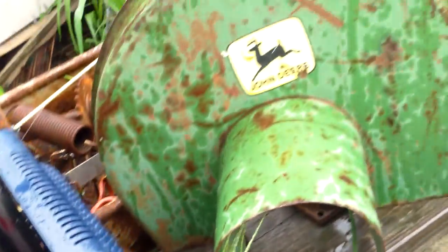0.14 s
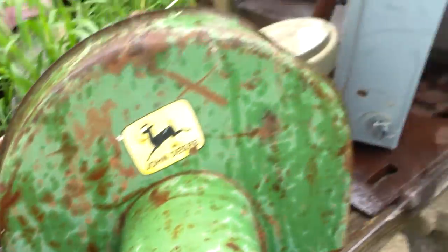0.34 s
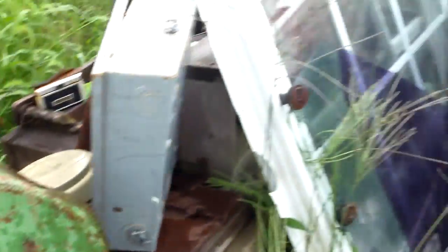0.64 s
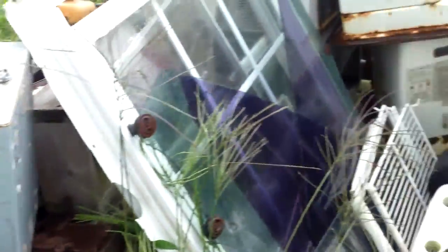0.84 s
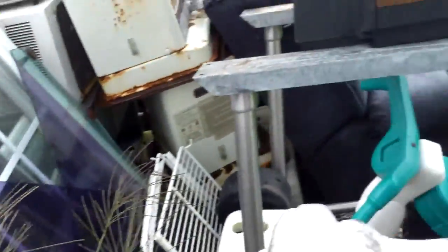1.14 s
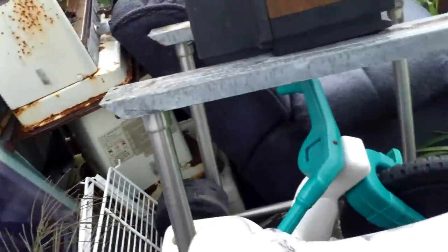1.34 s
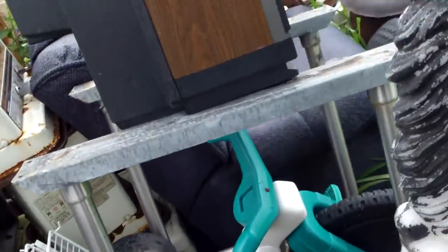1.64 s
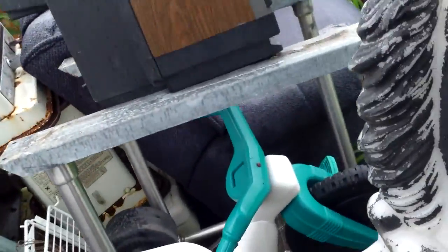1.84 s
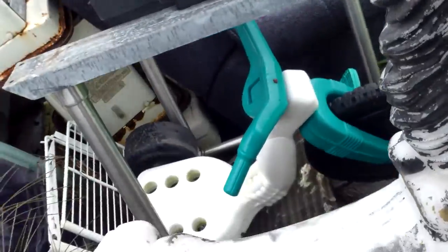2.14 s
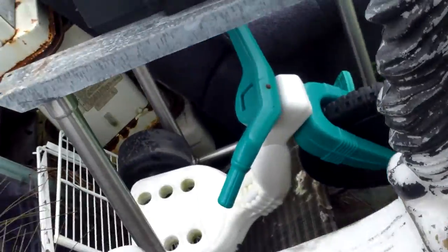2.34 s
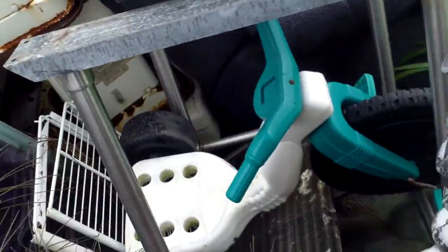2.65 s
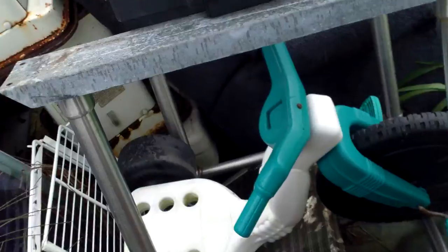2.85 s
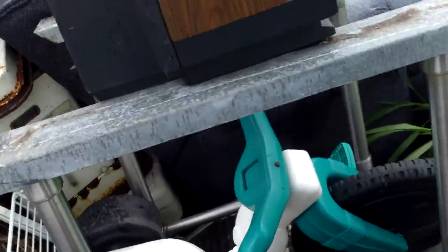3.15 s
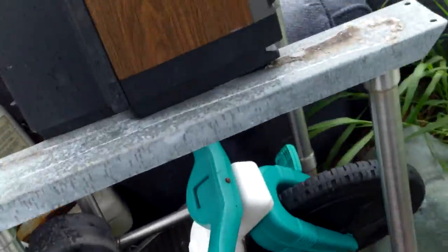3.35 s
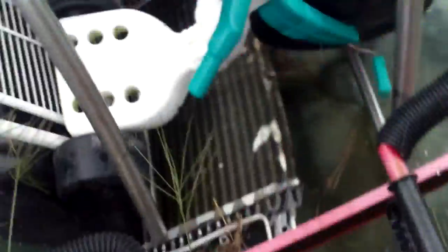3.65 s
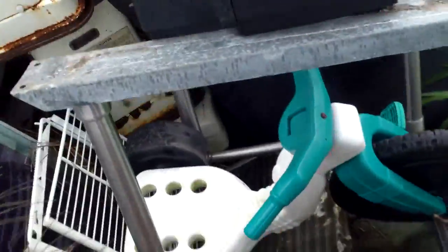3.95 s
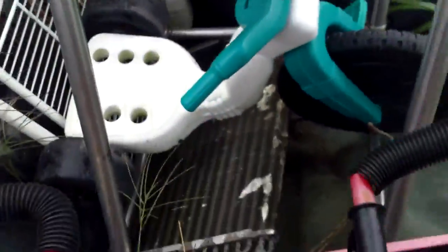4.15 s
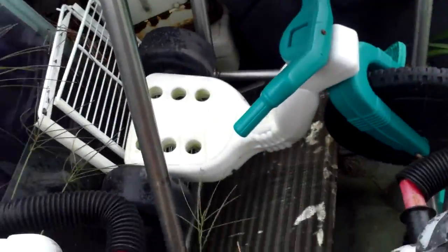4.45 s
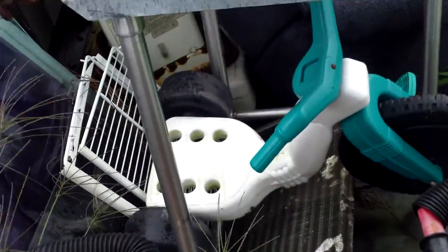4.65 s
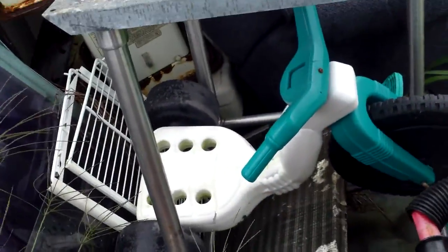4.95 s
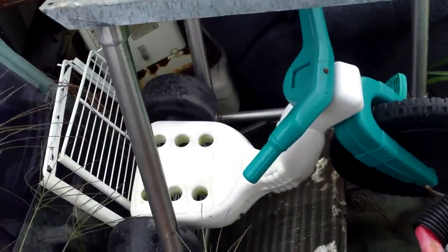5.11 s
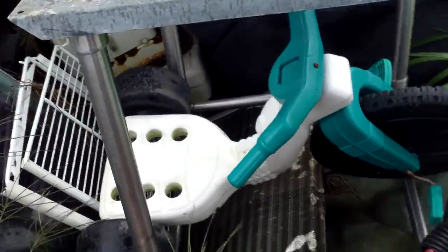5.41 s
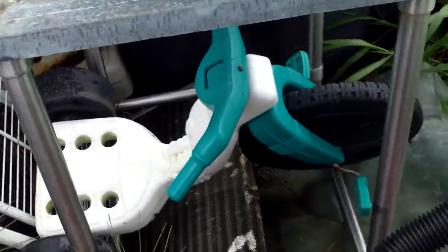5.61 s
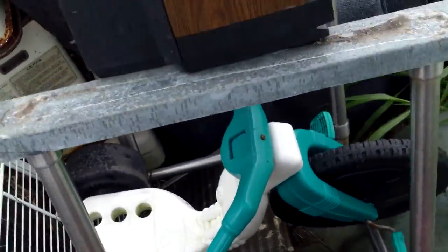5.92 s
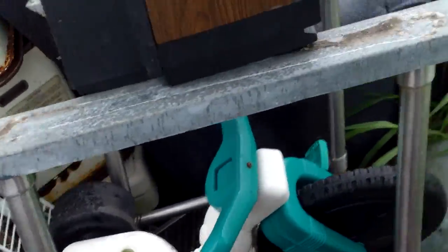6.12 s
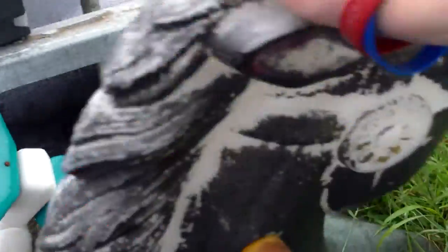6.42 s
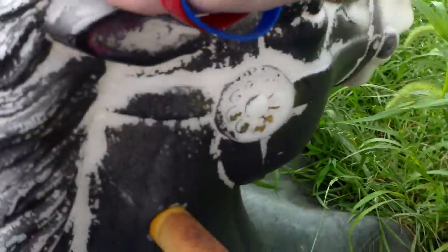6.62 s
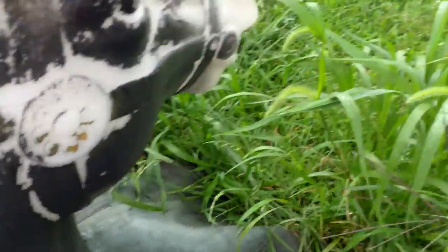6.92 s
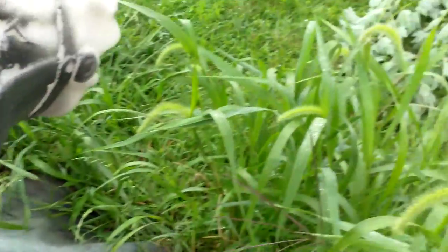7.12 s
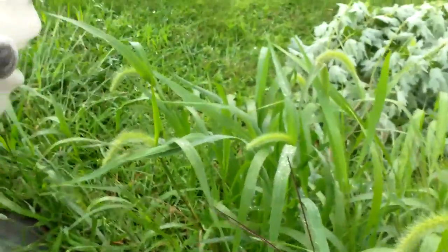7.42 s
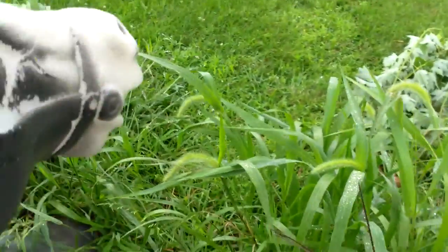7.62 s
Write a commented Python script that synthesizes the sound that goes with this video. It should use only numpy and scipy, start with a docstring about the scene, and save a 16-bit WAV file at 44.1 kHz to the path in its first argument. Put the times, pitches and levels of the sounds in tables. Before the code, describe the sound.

A hand-held microphone moves through tall wet grass beside piles of junk. Faint birds whistle first, over a steady quiet rain wash. Grass brushes, turf gives in soft lumps and drops or stems snap brightly. Close dry taps, a tiny squeak and rubs come from the casing, a cluster of hollow bumps sounds around three and a half seconds, and more thumps come near the end.

```python
"""A walk through wet grass and junk

Someone with a hand-held camera steps through tall wet grass between piles of junk, in light rain.
Shaped noise and random clicks make the rain, swishing blades, dragging soles and ticking stems.
Feet thud and knock hollow things: damped low tones with a noisy clatter. Small birds call in gliding tones.
Fingers tap, rub and squeak on the camera's casing close to the microphone: clicks through its resonances."""
import sys
import numpy as np
from scipy import signal
from scipy.fft import rfft, irfft
from scipy.io import wavfile
from scipy.ndimage import uniform_filter1d

SR = 44100
rng = np.random.default_rng(int(sys.argv[2]) if len(sys.argv) > 2 else 0)


def persist_wave(psi):
    """Save psi, clipped to +-1, as 16-bit WAV."""
    counts = np.round(np.clip(psi, -1, 1) * 32767).astype(np.int16)
    wavfile.write(sys.argv[1], SR, np.atleast_2d(counts).T)


N = 342657
TIME = np.arange(N) / SR  # s
HZ = np.fft.rfftfreq(4096, 1 / SR)  # the frequencies at which spectra are drawn

# Tone of the casing's body, also of a dull snap. Each row: frequency in Hz, level in dB.
BODY_TONE = [(300, -8), (620, -2.5), (1000, 0.5), (1900, -4.5), (3000, -10), (6000, -57)]
# Tone of blades and wet leaves. Each row: frequency in Hz, level in dB.
BLADE_TONE = [(300, -16), (1500, -14.5), (3500, -5), (6000, -1.5), (8500, 2), (11000, -3.5), (16000, -8.5)]


def amp(db):
    """Turns decibels into a gain."""
    return 10 ** (np.asarray(db) / 20)


def evened(x):
    """Scales a sound to an average strength (rms) of 1."""
    return x / np.sqrt(np.mean(x ** 2) + 1e-20)


def read(points, hz=HZ):
    """Reads a spectrum in dB, joining its points by straight lines on a log frequency axis."""
    f, db = np.transpose(points)
    return np.interp(np.log(hz + 1e-6), np.log(f), db)


def causal(db):
    """Builds a filter with the given gain on HZ that responds as early as it can (minimum phase)."""
    cepstrum = irfft(np.log(amp(db)))
    half = len(cepstrum) // 2
    # folding the second half onto the first moves the energy to the start
    cepstrum[1:half] *= 2
    cepstrum[half + 1:] = 0
    return irfft(np.exp(rfft(cepstrum)))


def colour(x, db):
    """Gives white sound a spectrum and keeps its power."""
    taps = causal(db)
    return signal.oaconvolve(x, taps / np.linalg.norm(taps))[:len(x)]


def add(mix, s, sound):
    """Mixes a sound in at s seconds."""
    part = mix[max(round(s * SR), 0):][:len(sound)]
    part += sound[:len(part)]


def drift(per_s):
    """A random wandering curve of rms 1, with per_s new values a second."""
    knots = np.arange(0, TIME[-1] + 1, 1 / per_s)
    return evened(np.interp(TIME, knots, rng.standard_normal(len(knots))))


def grains(per_s, spread_db):
    """Random clicks of rms 1; the further spread_db is from 0, the more their sizes differ."""
    size_db = spread_db * np.minimum(rng.exponential(1, N), 4.5)
    size = amp(size_db) * rng.choice([-1, 1], N)
    happens = rng.random(N) < per_s / SR
    return evened(size * happens)


def stroke(rise, hold, t60):
    """Power of one contact: it builds, holds until hold seconds, then falls by 60 dB in t60 seconds."""
    t = np.arange(SR // 2) / SR
    build = np.minimum(t / rise, 1)
    fall = amp(-60 * np.maximum(t - hold, 0) / max(t60, .01))
    return (build * fall) ** 2


def spattered(clicks, t60=0.078):
    """Each click shakes a wet leaf and turns into a short burst of fizz."""
    power = signal.oaconvolve(clicks ** 2, stroke(0.00019, 0, t60))[:N]
    return evened(rng.standard_normal(N) * np.sqrt(np.maximum(power, 0)))


def swells(rows, shape, lag, idle_db):
    """Strength of a repeated movement: each one builds to its crest and falls away; their powers add."""
    power = amp(idle_db) ** 2
    for crest, width, db in rows:
        # lag stretches the fall and shortens the rise by the same factor
        away = abs(TIME - crest) / (width * np.where(TIME > crest, lag, 1 / lag))
        # shape 2 is a round bell, shape 1 a pointed crest with long skirts
        power = power + (amp(db) * np.exp(-away ** shape)) ** 2
    return np.sqrt(power)


def rain(wash_db=4, drops_db=-11):
    """A smooth far wash of noise, with fine drops pattering on leaves as bursts of fizz."""
    # How the far rain comes and goes. Each row: time in seconds, level in dB before wash_db is added.
    wash_level = [(0, -49.5), (.7, -50.5), (1.3, -55), (4.6, -53), (7.77, -49.5)]
    # Tone of the far rain. Each row: frequency in Hz, level in dB.
    wash_tone = [(20, 15), (45, 19.5), (100, 8), (300, 4), (700, 1.5), (2000, -1.5), (5000, -6.5),
                 (9000, -12), (16000, -9)]
    level = amp(np.interp(TIME, *np.transpose(wash_level)) + wash_db)
    wash = colour(level * rng.standard_normal(N), read(wash_tone))
    drops = spattered(grains(per_s=79, spread_db=4.5))
    return wash + amp(drops_db) * colour(level * drops, read(BLADE_TONE))


def birds(echo_db=-7, echo_t60=0.6, waver=0.006):
    """Thin gliding whistles that waver slightly, scattered by the yard into a fading noisy echo."""
    # Bird notes. Each row: start in seconds, length in seconds, first and last pitch in Hz
    # around which the note wavers, level in dB.
    notes = [(0, .028, 2050, 1850, -43), (0, .04, 5900, 5950, -50), (.012, .034, 1560, 1420, -44),
             (.015, .03, 3000, 2930, -55), (.1, .07, 6130, 5930, -45), (.14, .06, 1300, 1120, -54),
             (.24, .06, 6130, 6000, -44), (.38, .07, 6080, 5850, -48), (.5, .1, 6050, 5900, -53),
             (.61, .17, 3370, 3240, -55), (1.205, .022, 3800, 4600, -52), (1.225, .05, 4600, 3450, -54),
             (7.56, .3, 6170, 6060, -50)]
    out = np.zeros(N)
    for s, length, first_hz, last_hz, db in notes:
        hz = np.linspace(first_hz, last_hz, int(length * SR))
        hz = hz * (1 + waver * drift(per_s=267)[:len(hz)])
        whistle = np.sin(2 * np.pi * np.cumsum(hz) / SR)
        add(out, s, amp(db) * np.hanning(len(hz)) * 2 * whistle)
    echo = rng.standard_normal(SR // 2) * np.sqrt(stroke(0.014, 0, echo_t60))
    return out + amp(echo_db) * signal.oaconvolve(out, echo / np.linalg.norm(echo))[:N]


def grass(crackle_db=-6, stems_db=-5, stems_per_s=30):
    """Blades brush the legs in countless tiny slips; underfoot the turf gives in soft lumps and stems crack."""
    # Blades sweeping along a leg or shoe. Each row: crest in seconds, half width in seconds, level in dB.
    sweeps = [(.27, 0.12, -41.5), (.54, 0.16, -46.5), (.8, 0.071, -43.5), (1.0, 0.15, -38),
              (1.33, 0.15, -45.5), (1.46, 0.039, -33.5), (1.64, 0.056, -46.5), (1.9, 0.059, -39),
              (2.04, 0.22, -42), (2.29, 0.07, -35), (2.47, 0.37, -50), (3.33, 0.066, -44.5),
              (3.56, 0.09, -41.5), (3.9, 0.15, -48.5), (4.17, 0.2, -46), (4.36, 0.075, -46.5),
              (4.82, 0.062, -51.5), (5.63, 0.15, -47), (5.9, .09, -49), (6.26, .13, -43.5),
              (6.79, 0.12, -45), (7.19, 0.11, -40), (7.35, 0.064, -35.5), (7.74, 0.2, -44)]
    # Weight rolling onto a foot. Each row: crest in seconds, half width in seconds, level in dB.
    footfalls = [(1.49, 0.063, -36.5), (1.88, 0.052, -38), (2.04, 0.12, -29.5), (2.31, 0.061, -35),
                 (2.77, 0.13, -39.5), (3.31, 0.1, -43), (3.68, 0.22, -35), (4.12, 0.15, -44.5),
                 (4.33, 0.14, -40), (4.82, 0.097, -44.5), (5.27, 0.064, -43.5), (5.58, 0.061, -41),
                 (5.78, 0.12, -36), (6.3, 0.2, -37), (6.69, 0.089, -29), (7.02, 0.058, -35.5),
                 (7.18, 0.042, -31), (7.32, 0.065, -31)]
    # Tone of the tread underfoot. Each row: frequency in Hz, level in dB.
    tread_tone = [(25, -13), (60, -6), (110, -1.5), (220, -7.5), (450, -9), (700, -20), (1500, -26.5),
                  (4000, -39.5), (10000, -44)]
    # Tone of cracking stems. Each row: frequency in Hz, level in dB.
    stem_tone = [(500, -13), (1500, -5.5), (3200, -1.5), (6000, -3), (9000, -1.5), (16000, -17)]
    # the idle level keeps the grass stirring even between strides
    speed = swells(sweeps, shape=1.3, lag=1.12, idle_db=-59)
    weight = swells(footfalls, shape=1.16, lag=0.97, idle_db=-58)
    brush = rng.standard_normal(N) * amp(1.0 * drift(per_s=37))
    crackle = amp(crackle_db) * grains(per_s=1400, spread_db=4.5) * amp(3.45 * drift(per_s=98))
    lumps = evened(grains(per_s=2000, spread_db=1.8) * amp(1.8 * drift(per_s=50)))
    # stems crack most where the leg both moves and bears down
    cracks = spattered(grains(per_s=stems_per_s, spread_db=3.5))
    stems = amp(stems_db) * np.sqrt(speed * weight) * cracks
    blades = colour(speed * (brush + crackle), read(BLADE_TONE))
    tread = colour(weight * lumps, read(tread_tone))
    return blades + tread + colour(stems, read(stem_tone))


def port_opening(close_s=0.055, open_s=0.004):
    """Gain of the yard at the microphone: a finger settles over the port and lifts off quickly."""
    # A finger shading the port. Each row: start in seconds, start of lift-off in seconds, level change in dB.
    covers = [(1.69, 1.782, -4), (2.79, 3.22, -3), (3.988, 4.065, -4), (5.058, 5.224, -7.5),
              (5.29, 5.52, -9)]
    db = 0
    for start, end, depth_db in covers:
        settling = np.clip((TIME - start) / close_s, 0, 1)
        lifting = np.clip((end - TIME) / open_s + 1, 0, 1)
        db = db + depth_db * settling * lifting
    return amp(db)


def scuffs():
    """A sole drags through wet turf: a soft dull swell of uneven clicks."""
    # Soles dragging. Each row: crest in seconds, half width in seconds, level in dB.
    drags = [(1.55, .07, -46), (1.83, 0.054, -42), (4.3, 0.014, -39), (4.815, 0.025, -47)]
    # Tone of the turf. Each row: frequency in Hz, level in dB.
    turf_tone = [(100, -16), (250, 6), (550, -1.5), (1000, -7.5), (1600, -28), (4000, -44)]
    drag = sum(amp(db) * np.exp(-((TIME - crest) / width) ** 2) for crest, width, db in drags)
    return colour(drag * grains(per_s=3200, spread_db=5.0), read(turf_tone))


def ticks(crest_db=9, t60=0.058, hold=0.00046):
    """A wet stem snaps or a drop lands: a short bright spatter with a duller snap inside."""
    # The clearest stems and drops nearby. Each row: start in seconds, level in dB before crest_db
    # is taken off, level of the dull snap in dB relative to the bright spatter.
    snaps = [(.0388, -36, -21), (0.3237, -27, -0.5), (.4584, -28, -20), (0.54, -19.5, -9),
             (0.575, -15.5, -36), (.8028, -25.5, -13), (1.441, -17.5, -6.5), (1.451, -11, -29),
             (1.8018, -27, -15), (1.8403, -18.5, -27), (1.9109, -20, -3), (2.065, -24, 2),
             (2.2458, -18.5, -11), (2.314, -15.5, -26), (2.6623, -29, -7), (3.1444, -32.5, -5),
             (3.813, -23, -27), (3.849, -25, -21), (4.0744, -34, -6), (4.127, -22, -31),
             (4.1685, -30.5, -0.5), (4.186, -28, -8), (4.2244, -39, -16), (4.314, -27, -13),
             (4.631, -39.5, 4.5), (4.813, -29, -24), (6.32, -28, -3), (6.3438, -14, -12),
             (6.4176, -26, -20), (6.5153, -23, -3), (6.6977, -7.5, -15), (6.836, -23, -23),
             (7.014, -23, -27), (7.09, -24, -3), (7.13, -20, -25), (7.2757, -17, -18), (7.3644, -20, -7),
             (7.407, -22, -6), (7.439, -21.5, -16)]
    bright, dull = np.zeros((2, N))
    for s, db, snap_db in snaps:
        power = amp(db - crest_db) ** 2 * stroke(0.001, hold, t60)
        add(bright, s, power)
        add(dull, s, power * amp(snap_db) ** 2)
    spatter = grains(per_s=14000, spread_db=-0.5)
    bright_part = colour(spatter * np.sqrt(bright), read(BLADE_TONE))
    dull_part = colour(spatter * np.sqrt(dull), read(BODY_TONE) / 2)
    return bright_part + dull_part


def knocks(rise=0.0027, clatter_t60=0.16, clatter_rise=0.001, thud_clatter_db=-13.5):
    """A damped low push and a clatter around its pitch; after a bump, loose junk rings on."""
    # Hollow junk being bumped. Each row: start in seconds, level of the push in dB, pitch in Hz,
    # time for the push to fall 60 dB in seconds, clatter level in dB, gain of the junk's ring in dB.
    bumps = [(2.266, -13, 375, .025, -30.5, -59), (3.117, -29, 447, .074, -41, -68),
             (3.429, 4, 476, 0.015, -20, -56), (3.521, -11, 404, .047, -18.5, -37.5),
             (3.526, -10, 977, .043, -20, -52), (3.609, -12, 259, 0.095, -16.5, -46),
             (5.674, -15.5, 374, 0.025, -28.5, -57), (5.794, -23, 430, 0.046, -26.5, -42),
             (5.862, -31, 230, 0.068, -26.5, -46), (5.952, -17, 505, 0.029, -19, -41.5),
             (6.960, -10.5, 368, 0.035, -21.5, -53.5), (6.965, -22.5, 954, .1, -29.5, -59),
             (7.175, -25, 997, .06, -25.5, -42.5)]
    # Heels landing on the turf. Each row: start in seconds, level of the push in dB, pitch in Hz,
    # time for the push to fall 60 dB in seconds.
    thuds = [(0.325, -31, 33, 0.5), (1.361, -19, 110, 0.049), (1.472, -21, 168, 0.041),
             (2.041, -15, 151, 0.071), (2.105, -14, 193, 0.024), (3.615, -19.5, 85.5, 0.16),
             (3.803, -31, 90, .11), (4.066, -28, 152, .06), (4.093, -23.5, 117, 0.069),
             (6.289, -25, 97, 0.2), (6.367, -20.5, 91.5, .097), (7.088, -6.5, 99, 0.044)]
    # Ringing tones of the loose junk. Each row: frequency in Hz, relative level in dB,
    # time to fall 60 dB in seconds.
    junk_modes = [(227, -11.5, 0.3), (556, -18, 0.13), (794, 10.5, 0.33), (1035, -1.5, 0.36),
                  (1200, 3, 0.5), (2180, -2, 0.05)]
    # Tone of the clatter. Each row: multiple of the knock's pitch, level in dB.
    clatter_tone = [(.1, -21), (.5, -5), (1, 1.5), (1.6, -4), (3, -14.5), (6, -23), (20, -37.5)]
    t, out = np.arange(SR // 2) / SR, np.zeros(N)

    def blow(db, hz, t60, clatter_db):
        """The push and clatter of one impact."""
        push = amp(db - 60 * t / t60) * np.sin(2 * np.pi * hz * t) * np.minimum(t / rise, 1)
        rattle = rng.standard_normal(len(t)) * np.sqrt(stroke(clatter_rise, 0, clatter_t60))
        return push + amp(clatter_db) * colour(rattle, read(clatter_tone, HZ / hz))

    ring = sum(amp(mode_db - 60 * t / decay) * np.sin(2 * np.pi * f * t) for f, mode_db, decay in junk_modes)
    for s, db, hz, t60, clatter_db, ring_db in bumps:
        add(out, s, blow(db, hz, t60, clatter_db) + amp(ring_db) * ring)
    for s, db, hz, t60 in thuds:
        add(out, s, blow(db, hz, t60, db + thud_clatter_db))
    return out


def squeak(s=2.713, length=0.031, slip_hz=375, jitter=0.073, db=-25, t60=0.035):
    """Wet skin catches and slips at a nearly regular rate: a short buzzing squeak."""
    # Tone of the squeak. Each row: frequency in Hz, level in dB.
    squeak_tone = [(200, -19), (370, 6), (800, -13), (3500, -18), (4000, -2), (4500, -25), (10000, -31)]
    turns = np.cumsum(slip_hz * (1 + jitter * drift(per_s=77))) / SR
    slips = evened(np.diff(np.floor(turns)))  # one click per whole turn
    force, out = amp(db) * np.sqrt(stroke(0.0022, length, t60)), np.zeros(N)
    add(out, s, colour(force * (slips - slips.mean())[:len(force)], read(squeak_tone)))
    return out


def contact(slips, s, levels_db, rise, hold, t60, linger=(.88, 1.6, 1.8), ripple_db=3.5,
            ripple_above_hz=600, brighten=0.17, soft_db=-28):
    """One touch in three registers: crack, body and hollow; the low ones ring longest."""
    # Casing resonances. Each row: frequency in Hz, width in Hz, boost or cut in dB.
    resonances = [(397, 230, 1.5), (648, 39, 5), (854, 66, 7), (1268, 29, 6), (2090, 28, 3.5),
                  (2720, 26, 3.5), (3540, 13, 3.5), (3830, 45, 2), (4300, 71, -6.5), (4800, 32, -9),
                  (5040, 47, -3), (6060, 21, -13), (6540, 43, 3.5), (7040, 60, -9), (7800, 40, -11.5)]
    # Tone of the sharp crack. Each row: frequency in Hz, level in dB.
    crack_tone = [(900, -34.5), (2000, -2.5), (4500, 1.5), (6500, 1), (9300, -3), (10800, -10),
                  (16000, -16.5)]
    # Tone of the casing's hollow. Each row: frequency in Hz, level in dB.
    hollow_tone = [(30, -39.5), (90, 1), (200, 1), (460, 5.5), (650, -19.5), (1500, -37)]
    casing_db = sum(db / (1 + (2 * (HZ - hz) / width) ** 2) for hz, width, db in resonances)
    # each spot on the shell favours its own narrow modes
    spot = rng.standard_normal(len(HZ))
    spot = evened(uniform_filter1d(uniform_filter1d(spot, size=9), size=5))
    spot_db = ripple_db * spot * HZ / (HZ + ripple_above_hz)
    sound = 0
    for slip, spectrum, db, longer in zip(slips, [crack_tone, BODY_TONE, hollow_tone], levels_db, linger):
        force = amp(db) * np.sqrt(stroke(rise, hold, t60 * longer))
        sharp_db = brighten * (db - soft_db) * np.log2(1 + (HZ / 9000) ** 2)  # harder touches are brighter
        tone_db = read(spectrum) + casing_db + spot_db + sharp_db
        sound = sound + colour(force * slip[round(s * SR):][:len(force)], tone_db)
    return sound


def fingers(crest_db=10.5, tap_rise=0.00032, tap_hold=0.0033, tap_t60=0.07, rub_rise=0.0069, rub_t60=.12,
            tap_grip_db=2.0, rub_grip_db=1.5):
    """Skin sticks and slips on the casing: dense slips in a tap, sparser ones of mixed sizes in a rub."""
    # Finger taps. Each row: start in seconds, level of the crack in dB before crest_db is taken off,
    # level of the body in dB, level of the hollow in dB.
    taps = [(2.552, -16, -31.5, -35.5), (2.583, -33, -35.5, -27.5), (2.604, -21, -29.5, -30.5),
            (2.707, -17.5, -30, -22), (2.7348, -8, -25.5, -26), (2.7504, -7.5, -29, -47),
            (2.8268, -24.5, -33.5, -34), (2.9639, -28.5, -33, -31), (3.383, -2, -27, -22),
            (3.5731, -3, -29, -48), (3.612, -11.5, -21.5, -23.5), (3.674, -24.5, -32.5, -37),
            (3.903, -22, -36.5, -33), (4.365, -19, -25, -33.5), (4.458, -30, -36.5, -43),
            (5.0047, -3.5, -28, -24), (5.111, -22.5, -45, -45), (5.12, -19.5, -37, -40),
            (5.1442, -22.5, -40, -55), (5.2972, -11, -34.5, -45.5), (5.528, -25.5, -42, -42),
            (5.6053, -27, -50, -51), (5.8252, -13, -24, -37), (6.1578, -12.5, -16.5, -35),
            (6.204, -18, -32, -34), (6.5351, -11, -21.5, -37)]
    # Fingers sliding. Each row: start in seconds, length in seconds, then the levels of crackle,
    # body and hollow in dB.
    rubs = [(2.712, 0.076, -34, -38.5, -32.5), (3.253, .014, -51, -45, -38), (3.311, 0.11, -42, -44, -38.5),
            (3.535, 0.0087, -20.5, -32, -49), (3.686, 0.093, -48, -40, -38.5),
            (4.349, 0.064, -46, -36, -33), (5.006, .003, -17, -27.5, -22), (5.032, 0.01, -23, -25.5, -35),
            (5.212, 0.013, -47.5, -60, -55), (5.688, 0.034, -19, -21, -29),
            (5.721, 0.031, -36.5, -32, -32.5), (5.828, 0.021, -42, -36, -34),
            (6.156, 0.026, -29.5, -22.5, -26.5), (6.237, 0.018, -34.5, -29.5, -27),
            (6.326, 0.032, -41.5, -46, -42), (6.544, 0.02, -35, -27.5, -28.5),
            (6.602, 0.031, -24.5, -26, -29.5), (6.65, 0.067, -26, -27, -27.5)]
    grip = drift(per_s=220)  # the skin catches and lets go many times a second
    dense = [evened(grains(per_s=12000, spread_db=0.5) * amp(tap_grip_db * grip)) for _ in range(3)]
    coarse = [evened(grains(per_s=4000, spread_db=1.04) * amp(rub_grip_db * grip)) for _ in range(3)]
    out = np.zeros(N)
    for s, peak_db, body_db, hollow_db in taps:
        levels_db = [peak_db - crest_db, body_db, hollow_db]
        add(out, s, contact(dense, s, levels_db, tap_rise, tap_hold, tap_t60))
    for s, length, *levels_db in rubs:
        add(out, s, contact(coarse, s, levels_db, rub_rise, length, rub_t60))
    return out


def scene():
    """All the sounds of the yard at one microphone; the finger over its port shades only some of them."""
    yard = port_opening() * (rain() + birds() + grass())
    return (yard + scuffs() + ticks() + knocks() + squeak() + fingers())[None]


def record(dry, edge_hz=15850):
    """The microphone port colours the treble; then everything above edge_hz is cut off."""
    # Colour of the microphone port. Each row: frequency in Hz, gain in dB.
    port_tone = [(4600, -2), (5250, 0), (5700, -1.5), (6250, 1), (6800, -6.5), (7400, 0), (8000, 3.5),
                 (9500, -2.5), (11000, -6), (13000, -6.5)]
    heard = signal.oaconvolve(dry, causal(read(port_tone))[None])[:, :N]
    lowpass = signal.firwin(511, edge_hz, window=("kaiser", 9), fs=SR)
    return signal.oaconvolve(heard, lowpass[None], "same")


dry = scene()
out = record(dry)
persist_wave(out)
```